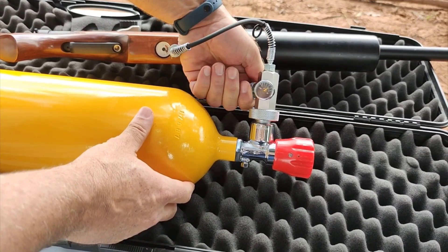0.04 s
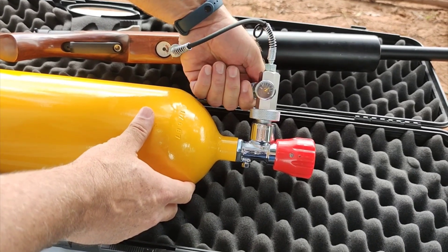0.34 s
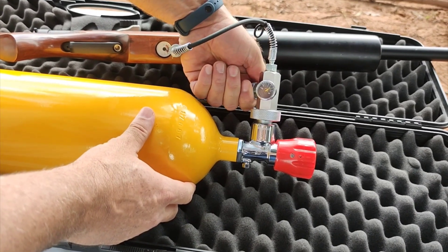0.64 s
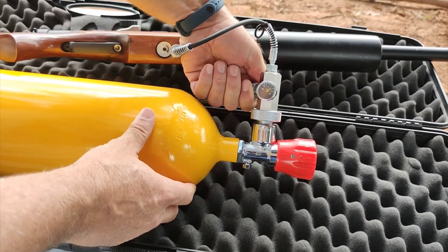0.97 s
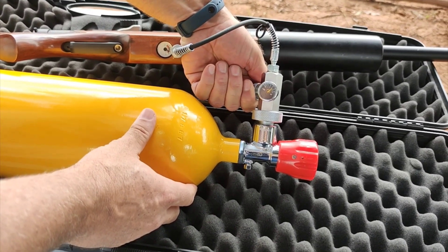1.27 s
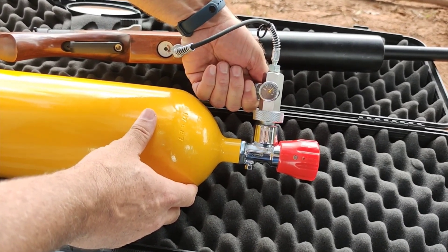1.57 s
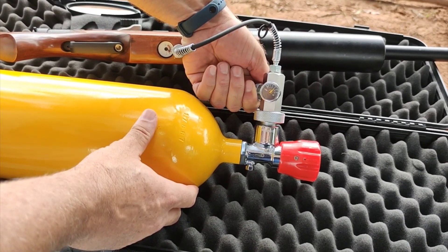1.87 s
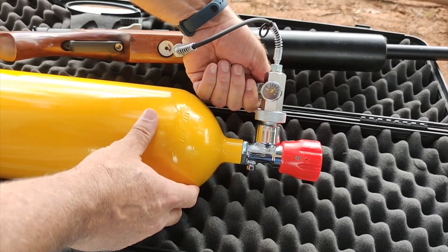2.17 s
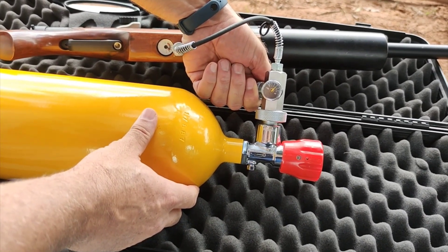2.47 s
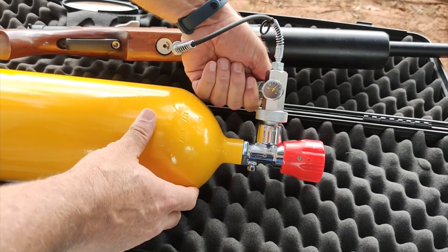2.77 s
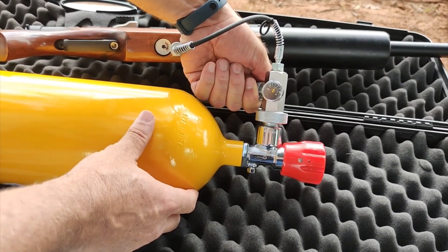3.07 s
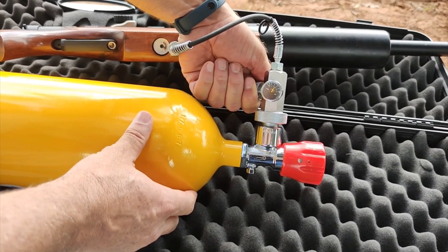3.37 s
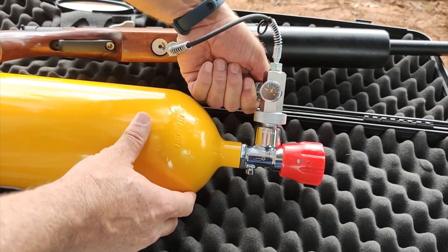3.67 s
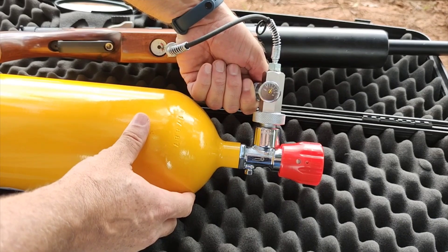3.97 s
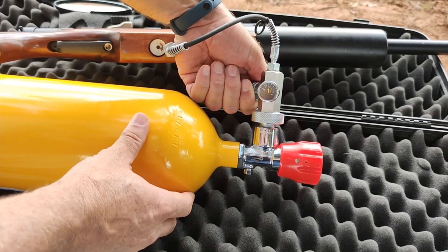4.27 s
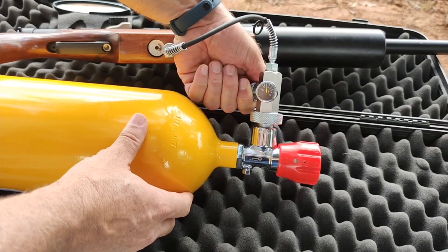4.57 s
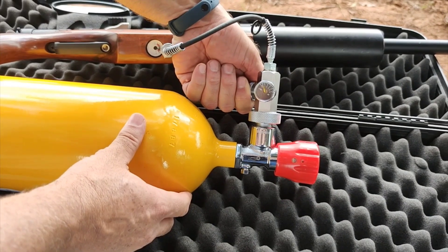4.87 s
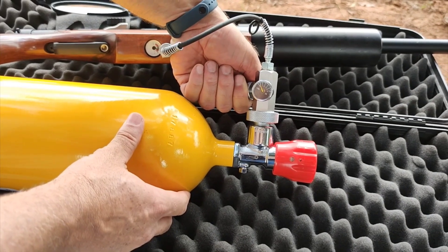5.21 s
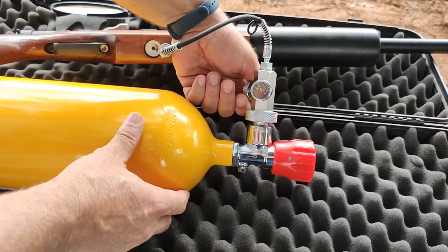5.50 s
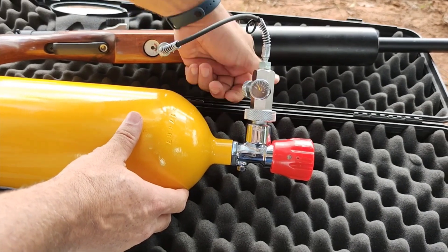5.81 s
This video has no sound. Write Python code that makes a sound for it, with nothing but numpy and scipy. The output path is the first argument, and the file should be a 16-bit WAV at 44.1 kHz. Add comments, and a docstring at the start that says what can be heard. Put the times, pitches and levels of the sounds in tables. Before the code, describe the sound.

From the start, high-pressure air hisses out of a slightly opened bleed screw on a cylinder's valve, heard close up outdoors. The hiss is bright and a little hollow, with a thin, wavering high whistle inside it. At about 1.2 seconds it jumps suddenly to a louder, fuller blast, which holds with a light flutter and small surges. Around 4.1 seconds the jet thins and starts to weaken, with brief spurts near 4.5 and 4.8 seconds and a couple of barely audible low hand bumps beneath it. The hiss then collapses quickly as the hose empties and is gone by about 5.4 seconds. A very faint low rumble of open air remains. Near 5.7 seconds a hand bumps softly on the gear, followed by a faint rub around 6 seconds.

```python
"""Bleeding a scuba filling hose

Outdoors, close by, a bleed screw on a cylinder's filling valve lets the air out of a high-pressure hose. The
turbulent jet hisses through the cracked screw with a thin, wavering edge tone, jumps to a full blast as the gap
opens, then thins and dies as the hose empties. Reflections from hand and cylinder interfere with it and make it
hollow. Gusts of the jet buffet the microphone, and the hand bumps softly on the gear, over the low rumble of
the open air."""
import sys
import numpy as np
from scipy import signal
from scipy.fft import rfft, irfft, next_fast_len
from scipy.io import wavfile
from scipy.ndimage import uniform_filter1d, map_coordinates

SR = 44100
rng = np.random.default_rng(int(sys.argv[2]) if len(sys.argv) > 2 else 0)


def unload_audio(sound):
    """Save the sound as a 16-bit wav file, at the path given as the first command line argument."""
    columns = np.transpose(np.atleast_2d(sound))
    # keep every value between -1 and 1, then stretch to whole-number steps
    steps = np.round(np.clip(columns, -1, 1) * 32767)
    wavfile.write(sys.argv[1], SR, steps.astype(np.int16))


N = 266599
TIME = np.arange(N) / SR
OPEN_S, THIN_S, EMPTY_S = 1.157, 4.114, 4.832  # the screw gives way, the jet thins, the hose runs empty
ATTACK_S = .017  # duration of a sudden step in the flow


def amp(db):
    """Amplitude ratio of a level in decibels."""
    return 10 ** (np.asarray(db) / 20)


def unit(x):
    """A signal normalised to rms 1."""
    return x / np.sqrt(np.mean(x ** 2) + 1e-20)


def along(points, hz):
    """Interpolation of (Hz, value) points on a logarithmic frequency axis."""
    freqs, values = np.transpose(points)
    return np.interp(np.log(hz + 1), np.log(freqs + 1), values)


def since(start_s):
    """Seconds elapsed since start_s, zero before it."""
    return np.maximum(TIME - start_s, 0)


def ramp(start_s, length_s):
    """A linear rise from 0 to 1."""
    return np.clip(since(start_s) / length_s, 0, 1)


def swell(peak_s, spread_s):
    """A Gaussian envelope with standard deviation spread_s."""
    return np.exp(-.5 * ((TIME - peak_s) / spread_s) ** 2)


def wobble(rate, at=TIME):
    """Smooth random modulation: a spline through rate knots a second, read at the given times."""
    return map_coordinates(rng.standard_normal(int(N * rate / SR) + 4), [at * rate], mode="nearest")


def patches(shape, bands, frames):
    """A random field of rms 1, correlated over neighbouring bands and frames."""
    across_bands = uniform_filter1d(rng.standard_normal(shape), bands, 0)
    return unit(uniform_filter1d(across_bands, frames, 1))


def filtered(x, response):
    """Linear filtering: the spectrum of x times a frequency response."""
    size = next_fast_len(N + SR // 4)
    return irfft(rfft(x, size) * response(np.fft.rfftfreq(size, 1 / SR)), size)[..., :N]


def resonance(hz, centre, width):
    """A Lorentzian peak with the given full width at half height."""
    return 1 / (1 + (2 * (hz - centre) / width) ** 2)


def above(hz, edge_hz, order):
    """A high-pass curve that rises from 0 to 1 and passes one half at edge_hz."""
    return 1 - 1 / (1 + (hz / edge_hz) ** order)


def noise(coherence):
    """White stereo noise whose mid-side balance sets the coherence, given as (Hz, coherence) points."""
    def balance(hz):
        angle = np.arccos(np.clip(along(coherence, hz), -.98, .98)) / 2
        return np.array([np.cos(angle), np.sin(angle)])
    mid, side = filtered(rng.standard_normal((2, N)), balance)
    return np.array([mid + side, mid - side])


def outdoors(unsteady_db):
    """Ambient noise of the open air: a slowly modulated rumble under a faint, steady hiss."""
    # Ambient spectrum. Each row: frequency in Hz, relative spectral density in dB.
    spectrum = [(12, -33.5), (20, -1), (70, -19.5), (103, -14), (133, -19), (581, -26.5), (3260, -36),
                (5500, -36), (7600, -34), (9930, -42), (15500, -37)]
    # Slow course of the rumble. Each row: time in seconds, gain in dB.
    rumble_course = [(0, -2), (1.2, 1), (2.3, 5), (4.2, 0.5), (5.0, 2.5), (5.5, 2)]
    white = noise([(30, 0.081), (150, 0.25), (4000, 0.21)])
    air = unit(filtered(white, lambda hz: amp(along(spectrum, hz))))
    rumble = filtered(air, lambda hz: 1 - above(hz, 140, order=4))
    rumble_db = np.interp(TIME, *np.transpose(rumble_course)) + unsteady_db * wobble(9.9)
    return amp(-62) * (air - rumble + amp(rumble_db) * rumble)


def flow():
    """Base level of the jet in dB: jet noise grows with the gap and falls with the driving pressure."""
    cracked_db, open_db, thin_drop_db = -25, -16.5, 2.08
    widen_db_per_s, sag_db_per_s, thin_db_per_s = 0.69, 0.76, 6.5
    widest_s = 2.85  # the gap stops widening and the pressure starts to sag
    blast_db = open_db + widen_db_per_s * (since(OPEN_S) - since(widest_s))
    opening_db = ramp(OPEN_S, ATTACK_S) * (blast_db - cracked_db)
    sag_db = sag_db_per_s * since(widest_s)
    thinning_db = thin_drop_db * ramp(THIN_S, ATTACK_S) + thin_db_per_s * since(THIN_S)
    empty_db = 21.5 * since(EMPTY_S) + 113 * since(EMPTY_S) ** 2  # an ever faster collapse
    return cracked_db + opening_db - sag_db - thinning_db - empty_db


def turbulence(modes, levels_db, low_hz, roar_hz, fizz_hz, drift, sway_db):
    """Broadband jet noise excites the valve's resonances, which drift in frequency and strength."""
    # The jet reaches the left microphone first. Each row: frequency in Hz, phase lead in radians.
    left_lead = [(400, 0.01), (750, 0.21), (1400, 0.65), (2500, 0.35), (5200, 0.11), (6500, 0.13)]
    hz, times, (common, separate) = signal.stft(rng.standard_normal((2, N)), SR, nperseg=1024)
    hz = hz[:, None]
    left_power = right_power = cross_power = 0
    for centre, width, db, pan_db, mode_coherence in modes:
        strength = amp(db + sway_db * wobble(5.96, times))
        drifting_hz = centre * (1 + drift * wobble(5.02, times))
        power = (strength * resonance(hz, drifting_hz, width)) ** 2
        left_power += power * amp(pan_db)
        right_power += power * amp(-pan_db)
        cross_power += power * mode_coherence
    coherence = np.clip(cross_power / np.sqrt(left_power * right_power), -.99, .99)
    coherence = coherence * np.exp(-1j * along(left_lead, hz))
    left = np.sqrt(left_power) * common
    right = np.sqrt(right_power) * (coherence * common + np.sqrt(1 - np.abs(coherence) ** 2) * separate)
    air = signal.istft(np.array([left, right]), SR, nperseg=1024)[1][:, :N]
    air = unit(filtered(air, lambda hz: np.sqrt(above(hz, low_hz, order=16))))
    roar = filtered(air, lambda hz: 1 - above(hz, roar_hz, order=8))
    fizz = filtered(air, lambda hz: above(hz, fizz_hz, order=40))
    hiss = air - roar - fizz
    return sum(amp(db) * band for db, band in zip(levels_db, (roar, hiss, fizz)))


def whistle(pitch_hz, waver_hz, flicker_db):
    """An edge tone at the screw's thread, modulated in frequency and amplitude by turbulence."""
    hz = pitch_hz + waver_hz * (wobble(140) + 0.73 * wobble(900) + .7 * wobble(17))
    tone = amp(flicker_db * wobble(110)) * np.sin(2 * np.pi * np.cumsum(hz) / SR)
    return unit(np.array([tone, tone]))


def jet():
    """Discharge through an orifice: noise and edge tone follow the flow, cracked, full and then thin."""
    # Valve resonances in the three stages of the jet. Each row: centre in Hz, width in Hz,
    # relative level in dB, left minus right level in dB, left-right coherence.
    cracked_modes = [(377, 370, -6, -1.5, 0.76), (820, 310, -6.5, 4, 0.65), (1410, 730, -14, 3, 0.32),
                     (2245, 650, -10, 9, 0.7), (2653, 800, -12, -15, 0.5), (3700, 1600, -12, -1.5, -0.63),
                     (4390, 370, -6.5, 2.5, 0.72), (4850, 580, -9, -13.5, -0.27),
                     (5200, 390, -6.5, 2, 0.47), (6300, 660, -2, -3.5, 0.045), (7060, 570, -0.5, 5.5, 0.76),
                     (7440, 390, -0.5, 1.5, 0.94), (7830, 460, -8.5, 9, 0.18), (9190, 1800, -14, 3.5, 0.26),
                     (10900, 1570, -10.5, 2, 0.7), (12350, 1300, -12, 7.5, 0.15),
                     (13530, 920, -12.5, 0, 0.72), (15619, 1450, -14.5, 0.4, 0.75)]
    full_modes = [(417, 320, -10.5, -8.1, 0.68), (760, 400, -6, -1.5, 0.75),
                  (1260, 640.0, -9.5, -5.5, 0.57), (2050, 420, -12.5, -1, -0.36),
                  (2415, 700, -10.5, 0.2, 0.57), (3290, 1630, -14.5, -14.5, -0.37),
                  (4571.0, 610, -9.5, 1.5, 0.66), (4770, 580, -9, -15, -0.55),
                  (5120, 460.0, -9, -1.3, 0.36), (6310, 930, -2.5, -3.5, -0.33),
                  (7103.0, 810, 0.0, -0.5, 0.99), (7470, 580, -6.5, -0.5, 1), (7770, 450, -4.5, 1.5, 0.1),
                  (9400, 1760.0, -12.5, -0.1, 0.51), (11030, 1510.0, -11, -0.8, 0.47),
                  (11780, 760, -13, -0.5, 0.39), (12680, 760, -8.7, 0.5, 0.87),
                  (13664.0, 550, -13.5, -2, -0.16), (14900, 770, -11, -0.4, 0.31)]
    thin_modes = [(353, 420, -9.5, -1.5, 0.69), (879.0, 380, -8.5, 0, 0.59), (1457.0, 1100, -15, 1, 0.38),
                  (2140, 500.0, -15, 17, 0.02), (2410, 410.0, -7.9, -4.3, 1), (3170, 800, -12, -12, -0.41),
                  (4280, 450, -8.5, 5.5, -0.06), (4716.0, 380, -8, -11.5, -0.19),
                  (5100, 470.0, -10, 3, 0.54), (6370, 930.0, -5.0, 1.3, -0.37), (6950, 440, 1.3, 5.5, 0.73),
                  (7410, 350, 0.5, 2, 0.82), (7936.0, 810.0, -11.5, 12, -0.02),
                  (9050, 510.0, -9.5, 5, 0.47), (10680, 2000, -14.5, -1.5, 0.64),
                  (11939.0, 1090.0, -12, 6.5, 0.63), (12580, 830, -14, 8.5, -0.26),
                  (13449.0, 880.0, -19, -8.3, 0.36), (15000, 940.0, -12, 0.5, 0.83)]
    # The flow spurts or chokes as the hand works the screw. Each row: peak time in seconds,
    # spread in seconds, level changes of hiss, roar and fizz in dB.
    surges = [(1.06, 0.015, -0.5, 1.5, -3), (1.266, 0.12, 1, 1.6, 1.2), (1.9, 0.25, 0, -0.5, -1.5),
              (2.16, 0.039, 1.6, 1, 1.5), (2.39, 0.0096, 1, -0.3, 0), (2.486, 0.012, -4, -0.5, -2.5),
              (2.84, 0.11, -0.2, 1.5, 0.5), (3.603, 0.011, -2.5, -1, -0.5), (3.883, 0.04, 2, 2.5, 0.7),
              (4.19, 0.059, 1.5, 4, 0), (4.412, 0.036, -0.5, 0, -2), (4.493, 0.043, 3.5, 2.5, 1),
              (4.583, 0.043, 3.5, 6, 1.5), (4.81, 0.049, 3, 2.5, 4.5), (5.145, 0.065, 4.5, 1.5, 3)]
    flutter_db, roar_empty_db_per_s = 0.45, 18  # the roar dies faster than the hiss as the hose empties
    opened, thinned = ramp(OPEN_S, ATTACK_S), ramp(THIN_S, length_s=0.28)
    blast = opened - thinned
    stages = [(cracked_modes, 1 - opened), (full_modes, blast), (thin_modes, thinned)]
    flow_db = flow()
    hiss_surge_db, roar_surge_db, fizz_surge_db = sum(
        np.outer(changes_db, swell(peak_s, spread_s)) for peak_s, spread_s, *changes_db in surges)
    roar_db = flow_db + roar_surge_db - roar_empty_db_per_s * since(EMPTY_S) + flutter_db * wobble(27)
    hiss_db = flow_db + hiss_surge_db + flutter_db * wobble(35)
    fizz_db = flow_db + fizz_surge_db + flutter_db * wobble(40)
    air = 0
    for modes, power_share in stages:
        air += np.sqrt(power_share) * turbulence(modes, (roar_db, hiss_db, fizz_db), low_hz=143,
                                                 roar_hz=1810, fizz_hz=8370, drift=0.003, sway_db=1.0)
    tone_db = flow_db + hiss_surge_db - 21.0 + 1.1 * wobble(28)
    tone = amp(tone_db) * whistle(pitch_hz=7180, waver_hz=98.9, flicker_db=5)
    sputter_db = (0.3 + 0.25 * blast) * (wobble(70) + 0.65 * wobble(400))
    return amp(sputter_db) * (air + tone)


def reflections(x, strength, near_s, far_s, sway_s, wander, flicker_db, count):
    """Interference: reflections from the hand cut broad notches, those from the gear add a fine comb."""
    # Bands cancelled by the hand's reflections. Each row: centre in Hz, width in Hz,
    # typical depths left and right in dB.
    hollows = [(574, 100, 7.5, 9.5), (1154, 200, 1, 7), (2840, 170, 6, 2), (2953, 300, 4.5, 12.5),
               (3420, 340, 3.5, -1), (4110, 290, 3, 8), (5460, 236, 9, 10), (8270, 240, 2.5, 1),
               (9940, 200, -1, -1.5)]
    # The shifting hand retunes the notches. Each row: time in seconds, frequency factor.
    hand_shift = [(0, 1.03), (1.9, 1.07), (2.6, 1), (4.15, 1.05), (4.6, 0.978), (5.2, 1.03)]
    hz, times, spectra = signal.stft(x, SR, nperseg=2048)
    hz = hz[:, None]
    shift = np.interp(times, *np.transpose(hand_shift))
    hollow_db = 0
    for centre, width, *depths_db in hollows:  # small movements vary each notch's depth and tuning
        depth_db = np.reshape(depths_db, (2, 1, 1)) * amp(4.5 * wobble(16, times))
        notch_hz = centre * (shift + wander * wobble(8, times))
        hollow_db += depth_db * resonance(hz, notch_hz, width) ** 2
    comb = 1
    for pair_s in rng.uniform(near_s, far_s, (count, 2)):
        delay_s = pair_s[:, None, None] + sway_s * wobble(2.516, times)  # the microphones sway
        comb += strength * above(hz, 400, order=2) * np.exp(-2j * np.pi * hz * delay_s)
    # the treble flickers in small patches
    patch_db = flicker_db * above(hz, 6800, order=30) * patches(spectra.shape[1:], bands=12, frames=2)
    gain = amp(patch_db - hollow_db) * np.abs(comb) / np.sqrt(1 + count * strength ** 2)
    return signal.istft(spectra * gain, SR, nperseg=2048)[1][:, :N]


def bumps():
    """Soft low bumps and friction: gusts of the jet buffet the microphone, and at the end the hand on the valve
    and padded case makes brief bands of noise."""
    # Gusts of the jet on the microphone, then the hand's bumps and rubs. Each row: peak time in seconds, spread
    # in seconds, level in dB, # centre in Hz, width in Hz.
    touches = [(1.95, .025, -56, 95, 50), (2.45, .016, -54, 95, 50), (3.24, 0.026, -53, 80, 40),
               (4.45, 0.06, -50, 115, 60), (4.69, 0.069, -50.5, 122, 60), (5.723, .016, -58, 69.9, 70.8),
               (5.731, 0.026, -65, 230, 330), (5.72, .04, -75, 6500, 7000), (5.985, .012, -71, 7800, 2490),
               (6.035, 0.037, -67, 1050, 1610)]
    rub = noise([(100, 0.38)])
    sound = 0
    for peak_s, spread_s, db, centre, width in touches:
        band = unit(filtered(rub, lambda hz: resonance(hz, centre, width)))
        sound += amp(db) * swell(peak_s, spread_s) * band
    return sound


def scene():
    """Superposition of the open air, the jet with its reflections, and the gusts and hand touches."""
    venting = reflections(jet(), strength=0.22, near_s=.002, far_s=.01, sway_s=.00004,
                          wander=0.0083, flicker_db=4.0, count=5)
    return outdoors(unsteady_db=2.5) + venting + bumps()


def record(dry):
    """Band limiting: a steep low-pass removes the highest treble."""
    return filtered(dry, lambda hz: 1 - above(hz, edge_hz=15800, order=300))


dry = scene()
out = record(dry)
unload_audio(out)
```